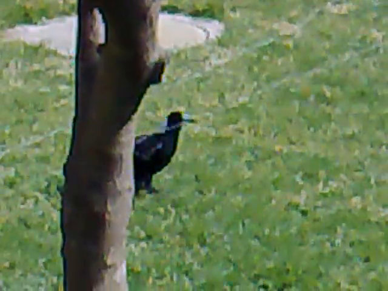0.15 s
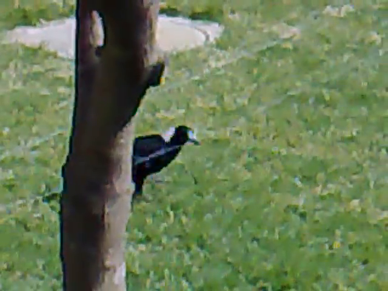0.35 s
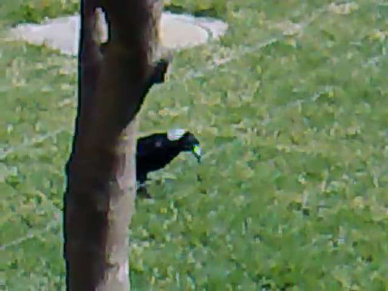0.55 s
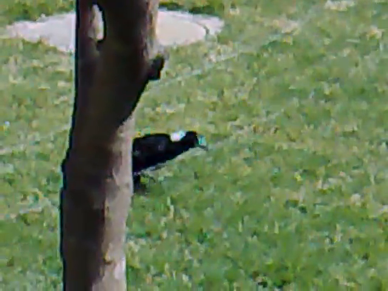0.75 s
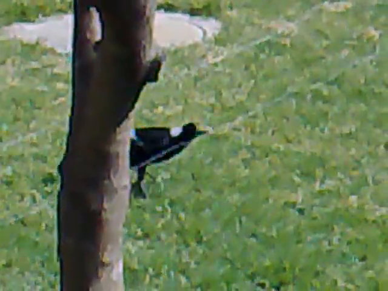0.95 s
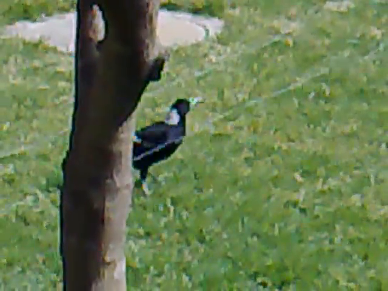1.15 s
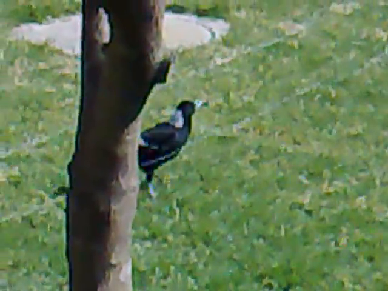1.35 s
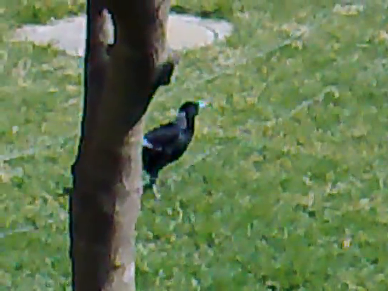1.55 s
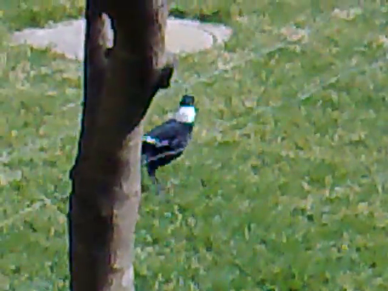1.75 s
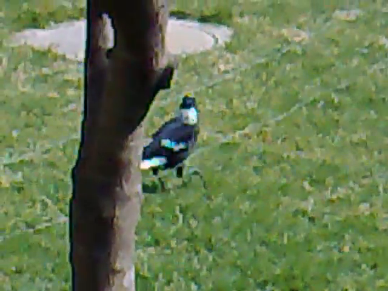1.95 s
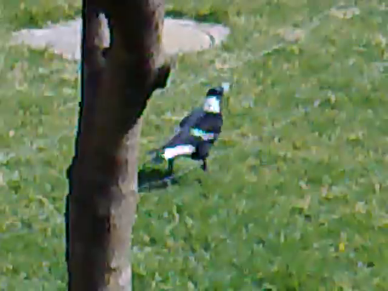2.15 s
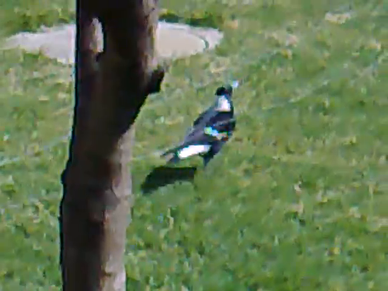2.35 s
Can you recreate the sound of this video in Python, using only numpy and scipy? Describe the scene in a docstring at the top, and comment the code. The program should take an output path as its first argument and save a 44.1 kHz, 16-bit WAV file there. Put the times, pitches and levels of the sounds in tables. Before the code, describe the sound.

A magpie gives a short harsh call on a lawn, with a slight echo off walls. Distant birds scold and whistle faintly, then the magpie calls again more softly. Low rumble, traffic drone and microphone hiss continue underneath.

```python
"""On a lawn between walls, over steady traffic and microphone hiss. At 0.2 s a magpie gives a harsh call:
two ragged voices near 1 and 1.2 kHz beat against each other through moving throat resonances, and the
walls answer. From 0.6 s birds scold and whistle far off. At 1.5 s the magpie calls again, softer and
trailing away. One last distant whistle rises at 2.3 s."""
import sys
import numpy as np
from scipy import signal
from scipy.fft import rfft, irfft, next_fast_len
from scipy.io import wavfile
from scipy.ndimage import map_coordinates

SR = 44100
rng = np.random.default_rng(int(sys.argv[2]) if len(sys.argv) > 2 else 0)


def to_wav(sig):
    """Store sig (one row per channel, or 1-D mono) as 16-bit WAV at the path in sys.argv[1].

    Samples outside -1..1 are clipped; the rate is SR.
    """
    pcm = np.clip(np.atleast_2d(sig), -1, 1) * 32767
    pcm = np.round(pcm).astype(np.int16)
    wavfile.write(sys.argv[1], SR, pcm.T)  # frames by channels


N = 105840
T = np.arange(N) / SR

# The two calls across the lawn, a list each: (time [s], relative level [dB], upper resonance over
# lower [dB], treble over lower [dB], lower resonance [Hz], upper resonance [Hz], low voice [Hz],
# high voice [Hz], share of high voice [0-1], roughness [0-1])
MAGPIE_CALLS = [
    [(.186, -68, -21, -28, 1900, 4100, 960, 1154, 0.2, 0.63),
     (.197, -49.5, -19, -30, 2020, 4100, 967, 1163, 0.2, 0.35),
     (.204, -41, -12.5, -23, 2050, 4080, 1036, 1162, 0, 0.14),
     (.214, -43, -12, -14, 2120, 3500, 990.3, 1124, 0, 0.51),
     (.235, -42, -7, -10.5, 2320, 3530, 953, 1135, 0.03, 0.42),
     (.258, -42, -1.5, -11, 2360, 3670, 953.7, 1183, 0.04, 0.11),
     (.272, -41, -13, -11.5, 2300, 3470, 945.5, 1204, 0.64, 0.28),
     (.284, -39.5, -15, -11, 2290, 3740, 983.6, 1187, 0.1, 0.49),
     (.294, -36.5, -10, -12, 2260, 3770, 1030, 1221, 0.35, 0.18),
     (.306, -39, -7, -7, 2360, 3940, 998.6, 1216, 0.05, 0.25),
     (.322, -35.5, -16.5, -10, 2250, 3760, 1007, 1167, 0.82, 0.31),
     (.34, -42, -13, -7.5, 2140, 3880, 1034, 1224, 0.3, 0.37),
     (.352, -58, 5, -8, 2300, 3780, 1050, 1274, .6, 0.4)],
    [(1.506, -81, -21, -27, 1900, 4100, 993, 1155, 0.2, 0.36),
     (1.52, -50, -17, -27, 1950, 4430, 1079, 1152, 0, 0.42),
     (1.532, -43.5, -13.5, -18, 2250, 4400, 1096, 1184, 0.18, 0.15),
     (1.55, -50.5, 0.5, -8.5, 2330, 3550, 1006, 1186, 0.64, 0.61),
     (1.57, -45, -5, -13, 2190, 3700, 992, 1194, 0.14, 0.54),
     (1.585, -48.5, 1, -3, 2440, 3970, 1010, 1205, .4, 0.3),
     (1.62, -48, -1, -2, 2420, 3820, 1009, 1230, 0.22, 0.42),
     (1.646, -52, -1.5, 1.5, 2440, 3900, 997, 1205, 0, 0.65),
     (1.682, -50.5, -8, -2.5, 2380, 3620, 980, 1206, 0, 0.51),
     (1.715, -64, -0.5, 0, 2470, 3700, 958, 1215, 0.9, 0.57),
     (1.745, -59.5, -17, -8, 2290, 3740, 958, 1190, 0.9, 0.7),
     (1.78, -73.5, -4, -2, 2260, 3790, 951, 1180, 0.6, 0.73),
     (1.92, -77.5, 0, -8, 2350, 3700, 947, 1162, .7, 0.6)],
]
# Throat resonances that stay put: (centre [Hz], width [Hz], gain [dB])
THROAT_RESONANCES = [(750, 300, -25), (1050, 500, -23), (1600, 400, -24), (2900, 350, -20)]
# Treble resonances of the open beak: (centre [Hz], width [Hz], relative gain [dB])
BEAK_RESONANCES = [(2640, 330, -10.5), (3460, 260, -8), (4910, 1660, -6), (5850, 1500, -22.5),
                   (6770, 520, -22.5)]
def magpie_call(rows, hiss_over_treble_db=-7.5):
    """Two voices ring through throat resonances that move as the beak opens; a flat broadband hiss
    rises and falls with the call."""
    times, level_db, upper_db, treble_db, lower_hz, upper_hz, *voice_columns = np.transpose(rows)
    source = two_voices(*(np.interp(T, times, column) for column in voice_columns))
    hz, frame_times, spectrum = signal.stft(source, SR, nperseg=256, noverlap=192)
    hz = hz[:, None]
    per_frame = lambda column: np.interp(frame_times, times, column)
    lower = resonance(hz, per_frame(lower_hz), width_hz=540)
    upper = amp(per_frame(upper_db)) * resonance(hz, per_frame(upper_hz), width_hz=740)
    beak = amp(per_frame(treble_db)) * resonances(hz, BEAK_RESONANCES)
    tract = lower + upper + beak + resonances(hz, THROAT_RESONANCES)
    voiced = 4 * signal.istft(spectrum * tract, SR, nperseg=256, noverlap=192)[1][:N]
    call_hiss = amp(hiss_over_treble_db + np.interp(T, times, treble_db)) * rng.standard_normal(N)
    return amp(np.interp(T, times, level_db, -120, -120)) * (voiced + call_hiss)


def two_voices(low_hz, high_hz, high_share, roughness, jitter=.045, beat_depth=.45, shimmer_db=2.5):
    """Two jittering pulse trains and turbulence, all swelling at the beat between the two pitches."""
    low_phase = phase_of(low_hz * (1 + jitter * roughness * wobble(300)))
    high_phase = phase_of(high_hz * (1 + jitter * roughness * wobble(300)))
    pulses = np.sqrt(1 - high_share) * pulse_train(low_phase)
    pulses += np.sqrt(high_share) * pulse_train(high_phase)
    turbulence = 2.2 * rng.standard_normal(N)
    mix = np.sqrt(1 - roughness) * pulses + np.sqrt(roughness) * turbulence
    beat = 1 + beat_depth * np.sqrt(high_share) * np.cos(high_phase - low_phase)
    shimmer = amp(shimmer_db * roughness * wobble(150))
    return mix * beat * shimmer


def pulse_train(phase, first_db=-5, smear_rad=.9):
    """Seven partials, the first weak, shifted in phase so that each pulse smears in time."""
    k = np.arange(1, 8)[:, None]
    partials = amp(first_db * (k == 1)) * np.cos(k * phase + smear_rad * k * k)
    return unit_rms(partials.sum(0))


# Echoes off the walls round the lawn: (delay [s], gain in the bass [dB])
WALL_ECHOES = [(.062, -16), (.085, -22), (.108, -20)]
# Reverberation of the yard: (frequency [Hz], time to fall 60 dB [s])
YARD_DECAY = [(1000, 0.26), (2300, 0.49), (4000, 0.52), (7000, 0.4), (12000, 0.15)]
def yard(direct, dull_hz=3500, tail_db=-12.5):
    """The microphone gets the direct sound, dull wall echoes and a tail whose treble dies first."""
    def walls(hz):
        reflections = sum(amp(db) * np.exp(-2j * np.pi * hz * delay) for delay, db in WALL_ECHOES)
        return reflections / (1 + (hz / dull_hz) ** 2)

    hz, age, spectrum = signal.stft(rng.standard_normal(SR // 2), SR, nperseg=256)
    decay = amp(-60 * age / log_interp(YARD_DECAY, hz)[:, None])
    impulse = signal.istft(spectrum * decay, SR, nperseg=256)[1]
    tail = signal.fftconvolve(direct, impulse / np.linalg.norm(impulse))[:N]
    return direct + filtered(direct, walls) + amp(tail_db) * tail


# Loudness of the scolding far off: (time [s], level [dB])
SCOLD_LEVELS = [(.62, -92), (.75, -84), (.82, -72), (1, -69), (1.1, -72), (1.15, -69.5), (1.23, -60),
                (1.34, -63), (1.4, -68.5), (1.5, -67), (1.56, -93)]
# The scolding birds' throats: (centre [Hz], width [Hz], relative gain [dB])
SCOLD_RESONANCES = [(2010, 620, 1), (2630, 420, -13), (3900, 2100, -9.5)]
def far_scolding():
    """Very rough voices through steady throat resonances, a blur at this distance."""
    times, level_db = np.transpose(SCOLD_LEVELS)
    source = two_voices(low_hz=980, high_hz=1150, high_share=.2, roughness=.9)
    rasp = filtered(source, lambda hz: resonances(hz, SCOLD_RESONANCES))
    return amp(np.interp(T, times, level_db, -120, -120)) * unit_rms(rasp)


# Whistles far from the microphone: (start [s], length [s], from pitch [Hz], to pitch [Hz], level [dB])
FAR_WHISTLES = [(.735, .05, 3820, 3760, -77), (.86, .05, 3800, 3750, -80), (1.1, .02, 3430, 3430, -74),
                (1.186, .045, 2830, 2820, -57), (1.211, .018, 3950, 4350, -65),
                (1.228, .085, 4470, 4430, -68), (1.256, .044, 3540, 3320, -63),
                (1.297, .018, 3430, 3600, -61), (2.3, .13, 2000, 2400, -70)]
def far_whistle(start, length, from_hz, to_hz, level_db, pitch_waver=.008, waver_db=3.5):
    """A distant bird's thin note: a gliding, wavering sine under a smooth swell."""
    progress = np.clip((T - start) / length, 0, 1)
    hz = (from_hz + (to_hz - from_hz) * progress) * (1 + pitch_waver * wobble(150))
    swell = amp(level_db + waver_db * wobble(100)) * np.sin(np.pi * progress)
    return swell * np.sqrt(2) * np.sin(phase_of(hz))


# Swells of the deep rumble: (time [s], level [dB])
RUMBLE_LEVELS = [(0.0, -60), (0.07, -54.5), (0.37, -58.5), (0.45, -46.5), (0.5, -57.5), (0.86, -53),
                 (0.95, -57.5), (1.12, -51.5), (1.18, -63), (1.38, -51), (1.46, -68), (1.55, -50.5),
                 (1.57, -63.5), (1.66, -51), (1.72, -68), (1.79, -55), (2.26, -54), (2.4, -67)]
# Colour of the rumble: (frequency [Hz], relative density [dB])
RUMBLE_SPECTRUM = [(12, -54), (20, -14.5), (70, -1.5), (82, 1), (108, -4.5), (200, -24), (260, -73),
                   (440, -120)]
def deep_rumble():
    """Noise strongest near 80 Hz rises and falls in lumps beneath the birds."""
    return level_curve(RUMBLE_LEVELS) * coloured_noise(RUMBLE_SPECTRUM)


# Drift of the traffic drone: (time [s], relative level [dB])
TRAFFIC_LEVELS = [(0.0, -65.5), (0.32, -64.5), (1.21, -65.5), (2.0, -66), (2.4, -64.5)]
# Colour of the drone: (frequency [Hz], relative density [dB])
TRAFFIC_SPECTRUM = [(88, -44), (150, 2.5), (382, -9.5), (421, -9), (505, -13.5), (681, -12.5), (1500, -23),
                    (1950, -26), (3300, -120)]
def traffic_drone():
    """Traffic beyond the lawn merges into a nearly even noise, strongest at 150 Hz."""
    return 1.64 * level_curve(TRAFFIC_LEVELS) * coloured_noise(TRAFFIC_SPECTRUM)


# The microphone's noise floor: (frequency [Hz], relative density [dB])
HISS_SPECTRUM = [(300, -2.5), (1500, 3.5), (3000, 1), (6000, -2.5), (8500, -3), (9100, 1.5), (9700, -3.5),
                 (15800, -2)]
def microphone_hiss(level_db=-63.5):
    """The microphone's own smooth, steady hiss."""
    return amp(level_db) * coloured_noise(HISS_SPECTRUM)


def amp(db):
    return 10 ** (np.asarray(db) / 20)


def unit_rms(x):
    return x / np.sqrt(np.mean(x ** 2) + 1e-20)


def phase_of(hz):
    return 2 * np.pi * np.cumsum(hz) / SR


def level_curve(rows):
    return amp(np.interp(T, *np.transpose(rows)))


def log_interp(points, hz):
    """Read (frequency [Hz], value) points along a log frequency axis."""
    point_hz, values = np.transpose(points)
    return np.interp(np.log(hz + 1), np.log(point_hz + 1), values)


def wobble(rate):
    """A smooth random curve with rate knots a second."""
    return map_coordinates(rng.standard_normal(int(N * rate / SR) + 4), [T * rate])


def filtered(x, response):
    """Pass x through a gain given as a function of frequency."""
    size = next_fast_len(N + SR // 2)
    return irfft(rfft(x, size) * response(np.fft.rfftfreq(size, 1 / SR)), size)[..., :N]


def resonance(hz, centre_hz, width_hz, steepness=3):
    """Gain of one resonance with steep skirts."""
    return 1 / (1 + np.abs(2 * (hz - centre_hz) / width_hz) ** steepness)


def resonances(hz, table):
    """Summed gain of several steady resonances."""
    return sum(amp(db) * resonance(hz, centre, width) for centre, width, db in table)


def coloured_noise(spectrum):
    """Noise of rms 1 with the given spectrum."""
    return unit_rms(filtered(rng.standard_normal(N), lambda hz: amp(log_interp(spectrum, hz))))


def scene():
    """One microphone on the lawn: the magpie nearest, other birds far off, rumble and hiss behind."""
    magpie = sum(yard(magpie_call(rows)) for rows in MAGPIE_CALLS)
    far_birds = yard(far_scolding() + sum(far_whistle(*row) for row in FAR_WHISTLES))
    return (magpie + far_birds + deep_rumble() + traffic_drone() + microphone_hiss())[None]


def record(dry, top_hz=15730):
    """The recorder keeps nothing above its band limit."""
    return filtered(dry, lambda hz: hz < top_hz)


dry = scene()
out = record(dry)
to_wav(out)
```